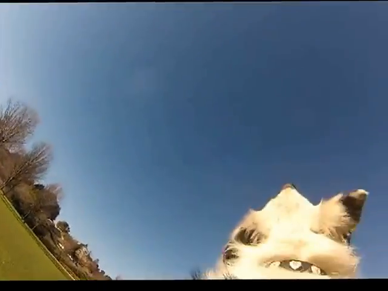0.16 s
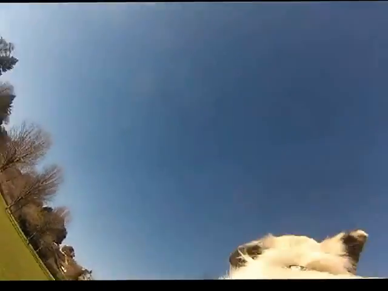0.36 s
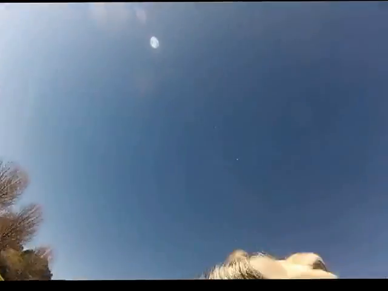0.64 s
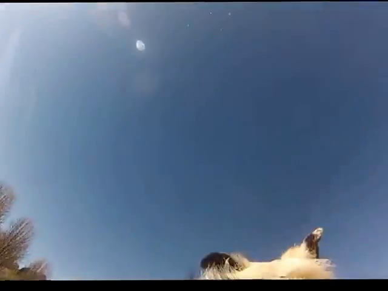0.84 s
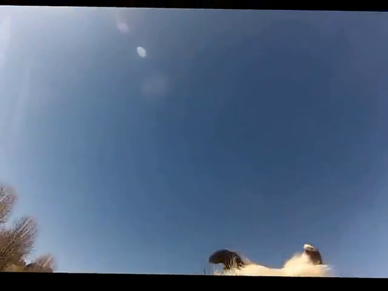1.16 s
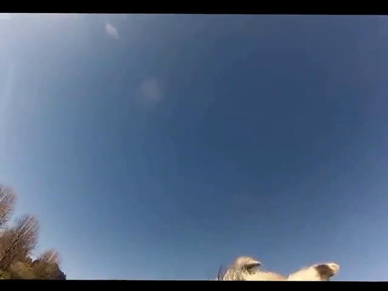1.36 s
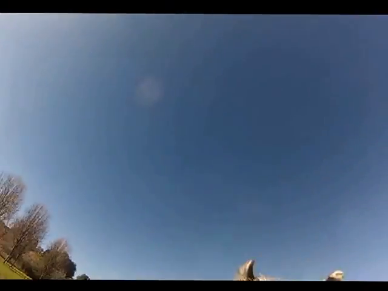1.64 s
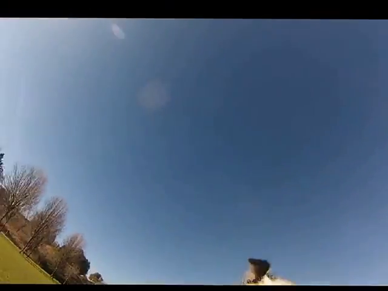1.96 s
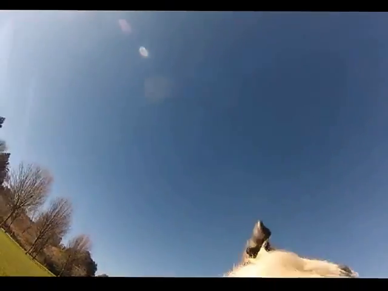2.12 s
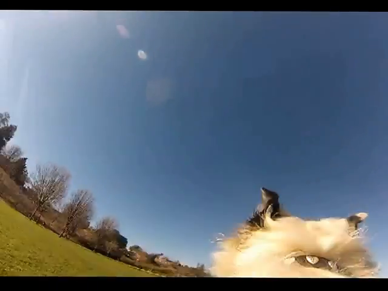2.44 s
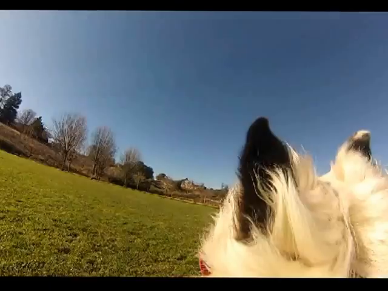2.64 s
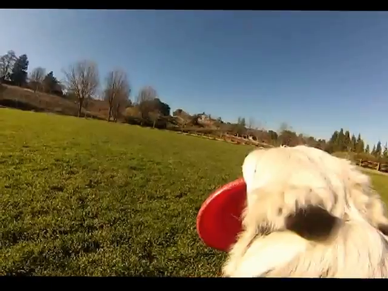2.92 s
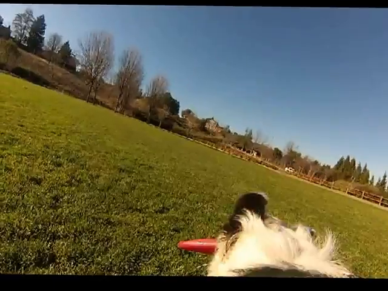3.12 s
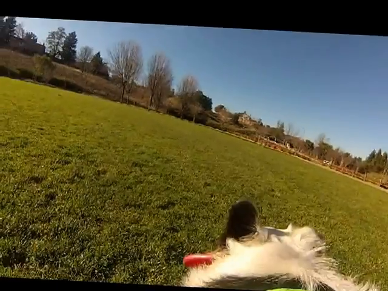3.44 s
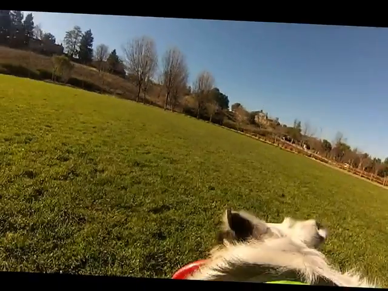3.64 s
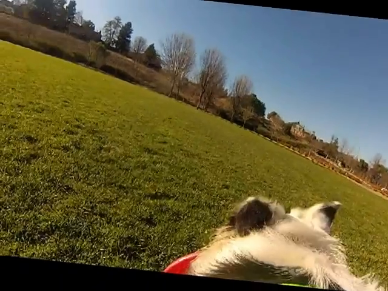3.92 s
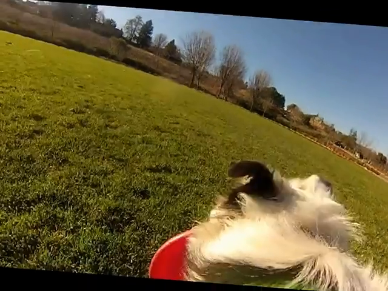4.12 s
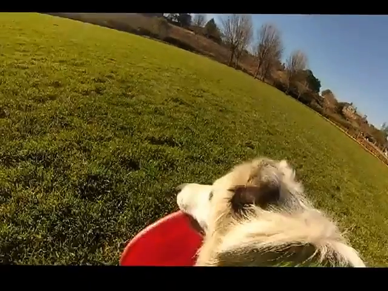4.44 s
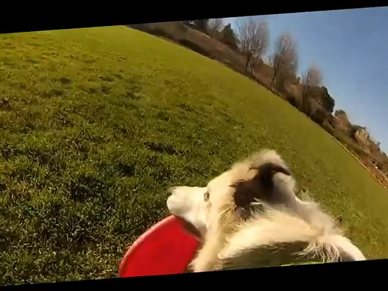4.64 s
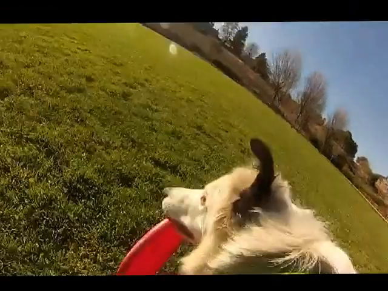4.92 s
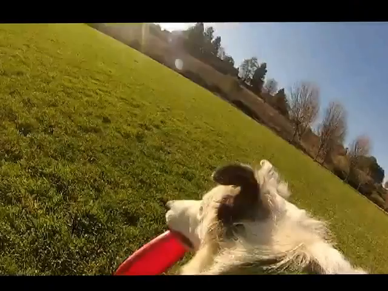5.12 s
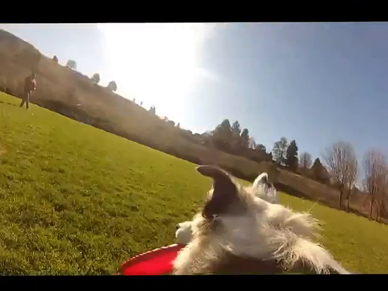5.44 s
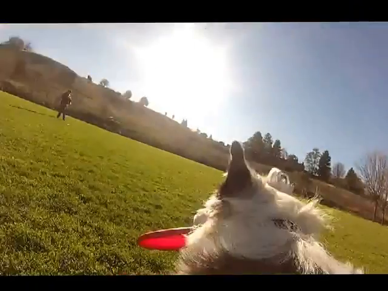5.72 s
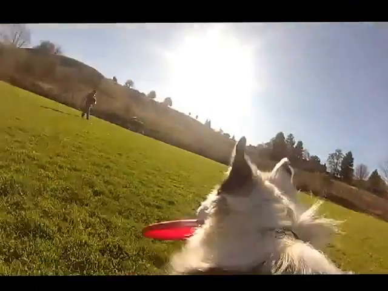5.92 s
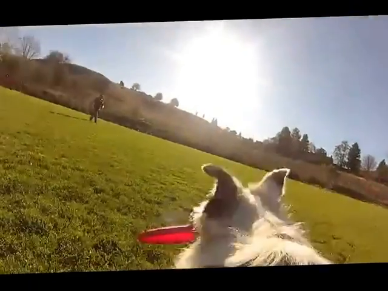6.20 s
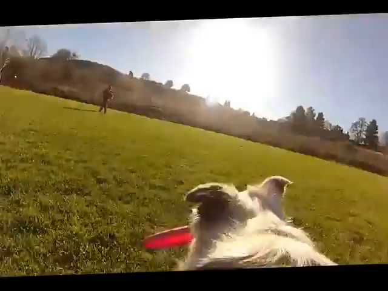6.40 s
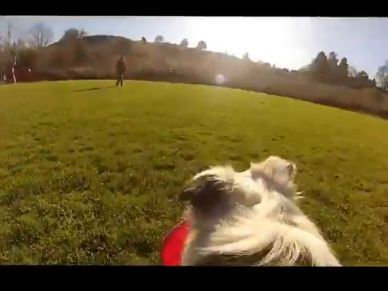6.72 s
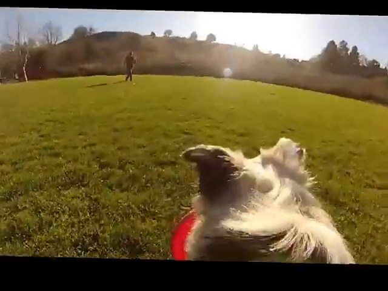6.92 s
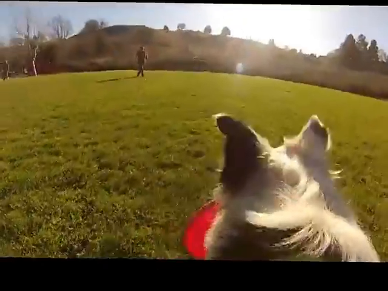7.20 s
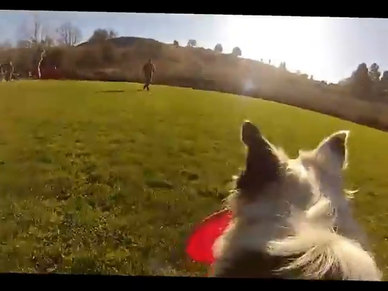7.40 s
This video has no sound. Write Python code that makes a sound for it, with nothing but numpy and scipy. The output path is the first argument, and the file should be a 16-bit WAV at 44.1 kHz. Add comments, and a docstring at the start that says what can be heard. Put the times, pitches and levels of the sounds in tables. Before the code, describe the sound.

Slowed, stuttering camera rattle on a running dog: low wavering hum, wind rumble, strap rubbing, repeated hard plastic clacks early, then small ticks fading.

```python
"""A sealed camera rides on the back of a running dog in a park: filtered-noise wind and harness rumble, fur rustle,
ticks, thin gliding bird whistles (sines) and a low wavering hum start together. The birds stop after about 2 s;
between about 2 and 3 s the housing rings under its hardest knocks, and near 5 s the octave of the hum swells.
About 1.6 s of action is played five times slower at the same pitch: every 117 ms the playback jumps back and
repeats, so each knock stutters four to six times."""
import sys
import numpy as np
from scipy import signal
from scipy.fft import rfft, irfft
from scipy.io import wavfile
from scipy.ndimage import uniform_filter1d

SR = 44100
rng = np.random.default_rng(int(sys.argv[2]) if len(sys.argv) > 2 else 0)


def transcribe(u):
    """Save the signal u as a 16-bit wav file named by the first command-line argument.

    u: samples, shape (n,) or (channels, n), limited to [-1, 1]; the rate is SR.
    q: integer samples, one column per channel.
    """
    v = np.clip(np.atleast_2d(u).T, -1, 1)
    q = np.round(v * 32767).astype(np.int16)
    wavfile.write(sys.argv[1], SR, q)


N = 333396
LIVE = round(1.75 * SR)   # samples of live action; every table time is live, before the slowing


def amp(db):
    """Decibels to a linear gain."""
    return 10 ** (np.asarray(db) / 20)


def rms_one(x):
    """Scale a signal to rms 1."""
    return x / np.sqrt(np.mean(x ** 2) + 1e-20)


def gains(rows):
    """The dB columns of a level curve as gains in live time."""
    s, *levels = np.transpose(rows)
    return [amp(np.interp(np.arange(LIVE) / SR, s, db)) for db in levels]


def swells(rows, steady):
    """Each row swells and fades smoothly, adding in power to the steady gains."""
    power = np.square(steady)
    t = np.arange(LIVE) / SR
    for middle_s, length_ms, *db in rows:
        across = np.clip((t - middle_s) * 1000 / length_ms, -0.5, 0.5)
        power = power + amp(db)[:, None] ** 2 * np.cos(np.pi * across) ** 4
    return np.sqrt(power)


def drift(rate_hz):
    """Random wander of rms 1: noise smoothed by two equal one-pole lowpasses."""
    r = np.exp(-2 * np.pi * rate_hz / SR)
    wander = signal.lfilter([1], [1, -2 * r, r * r], rng.standard_normal(LIVE + SR))
    return rms_one(wander[SR:])   # the filter settles during the first second


def rubbing(colour, even_ms, grain_db):
    """Coloured noise of rms 1: grain roughens it, and swings slower than even_ms are levelled."""
    hz = np.maximum(np.fft.rfftfreq(LIVE, 1 / SR), 1)
    points = np.array(colour)
    shape = amp(np.interp(np.log(hz), np.log(points[:, 0]), points[:, 1], left=-80, right=-80))
    grainy = rng.standard_normal(LIVE) * amp(grain_db * drift(186))
    coloured = irfft(rfft(grainy) * shape, LIVE)
    local_power = uniform_filter1d(coloured ** 2, max(int(even_ms * SR / 1000), 1))
    return rms_one(coloured / np.sqrt(local_power + 1e-20))


def ride():
    """Noise layers for sway, wind, straps, fur and grass follow the stride; returns mid and side."""
    # colours of the layers: (frequency [Hz], relative density [dB per Hz])
    sway_colour = [(12, 8), (25, 3.5), (50, -0.5), (75, -27.5)]
    buffet_colour = [(40, -37), (62, 5.5), (90, 1.5), (120, -5.5), (175, -7), (260, -23.5)]
    rub_colour = [(150, -14.5), (220, 3.5), (330, -1.5), (480, -9.5), (620, -17)]
    creak_colour = [(400, 6.5), (520, 3.5), (750, 1.5), (1050, -5), (1350, -33)]
    drone_colour = [(480, -5), (580, 0.5), (720, -4), (850, -17)]
    rustle_colour = [(950, -1), (1400, 2.5), (2500, -0.5), (3100, -4.5), (3700, -8), (4800, -18),
                     (6000, -19)]
    swish_colour = [(4000, -3.5), (5200, -0.5), (6200, 0.5), (7400, 1.5), (8400, 4), (9600, -1), (11800, 0),
                    (14000, -6.5), (15300, -8), (16500, -24)]
    # the back sways under the camera: (time [s], level [dB])
    swaying = [(.05, -18), (.2, -22.5), (.27, -30.5), (.35, -17.5), (.41, -25), (.47, -16.5), (.565, -33.5),
               (.63, -22), (.69, -25), (.73, -28.5), (.77, -25.5), (.86, -25.5), (.99, -33.5), (1.04, -26),
               (1.13, -20), (1.17, -29), (1.26, -39), (1.3, -29), (1.35, -34), (1.46, -44), (1.59, -35)]
    # wind on the housing: (time [s], level [dB])
    wind = [(.05, -31.5), (.17, -25), (.25, -24), (.3, -32.5), (.34, -30.5), (.42, -26.5), (.46, -56),
            (.5, -19.5), (.63, -44), (.75, -26), (.81, -35.5), (.84, -20), (.9, -39), (.99, -34),
            (1.06, -19), (1.12, -22.5), (1.17, -40), (1.3, -33), (1.59, -34.5)]
    # background rub of the harness, strongest near 0.8 s, then weaker: (time [s], rub level [dB])
    background_rub = [(.05, -48), (.3, -43), (.42, -45.5), (.65, -45), (.8, -36.5), (1.0, -50.5),
                      (1.2, -48.5), (1.6, -49)]
    # strides tug the straps: (middle [s], length [ms], rub level [dB], creak level [dB])
    tugs = [(.08, 80, -37, -39.5), (.165, 156, -34.5, -39), (.235, 58, -33, -47), (.28, 120, -40, -56),
            (.497, 52, -23, -37), (.595, 79, -31.5, -33.5), (.762, 45, -31, -40.5), (.845, 63, -38, -41),
            (.885, 30, -52, -42.5), (1.08, 173, -35, -46.5), (1.126, 74, -32.5, -45), (1.24, 260, -53, -56)]
    # a taut strap drones in a narrow band: (middle [s], length [ms], level [dB])
    drones = [(.16, 71, -45), (.6, 54, -50), (1.235, 130, -45.5)]
    # steady brushing of coat and grass: (time [s], fur level [dB], grass level [dB])
    coat = [(.05, -56.5, -68), (.3, -56, -72.5), (.55, -53.5, -58), (.66, -61.5, -63.5), (.8, -54.5, -61.5),
            (1.0, -56.5, -63), (1.3, -56, -64.5), (1.6, -55.5, -67)]
    # fur and grass sweep past: (middle [s], length [ms], fur level [dB], grass level [dB])
    sweeps = [(.592, 45, -40.5, -50.5), (.072, 27, -43, -60), (.116, 110, -51.5, -71),
              (.16, 23, -53.5, -57.5), (.215, 170, -56, -60), (.35, 190, -81, -68.5),
              (.446, 44, -52.5, -49.5), (.517, 54, -49, -64), (.602, 126, -48, -54), (.725, 148, -56, -63),
              (.774, 72, -57, -53), (.84, 85, -50, -50.5), (.886, 81, -54, -51), (.95, 15, -50.5, -57),
              (1.15, 250, -57.5, -54.5), (1.24, 270, -54, -66.5), (1.456, 19, -67, -89)]

    (sway,), (buffet,), (background,) = gains(swaying), gains(wind), gains(background_rub)
    creak_below_db = 6.5   # background creak beneath the background rub
    rub, creak = swells(tugs, [background, background * amp(-creak_below_db)])
    rustle, swish = swells(sweeps, gains(coat))
    (drone,) = swells(drones, np.zeros((1, LIVE)))

    rumble = sway * rubbing(sway_colour, even_ms=68, grain_db=2.5)
    rumble = rumble + buffet * rubbing(buffet_colour, even_ms=17.4, grain_db=1.5)
    straps = rub * rubbing(rub_colour, even_ms=18.6, grain_db=5.0)
    straps = straps + creak * rubbing(creak_colour, even_ms=14.6, grain_db=8.0)
    straps = straps + drone * rubbing(drone_colour, even_ms=71, grain_db=1.5)
    brush = rustle * rubbing(rustle_colour, even_ms=61, grain_db=1.0)
    brush = brush + swish * rubbing(swish_colour, even_ms=65, grain_db=2.0)

    # a faint noise, opposite in left and right, follows the creak, fur and grass levels
    side = amp(-39.0) * creak * rubbing(creak_colour, even_ms=13, grain_db=4.0)
    side = side + amp(-25.0) * rustle * rubbing(rustle_colour, even_ms=38, grain_db=16.0)
    side = side + amp(-18.5) * swish * rubbing(swish_colour, even_ms=25, grain_db=2.0)
    return rumble + straps + brush, side


def ring(x, hz, t60):
    """A two-pole resonator: a unit click sets a decaying sine of height 1 ringing."""
    r = amp(-60 / (t60 * SR))
    w = 2 * np.pi * hz / SR
    return signal.lfilter([0, np.sin(w)], [1, -2 * r * np.cos(w), r * r], x + 1e-18)


def knocks():
    """The housing knocks on its mount: band-limited chatter excites housing modes, beside decaying sines."""
    # parts of the knocks, several rows to a blow: chatter plus a decaying sine, low thud or high ring:
    # (time [s], chatter drive [dB], chatter length [ms], contact from [Hz], contact to [Hz],
    # sine drive [dB], sine pitch [Hz], sine t60 [s], sign of the first swing)
    parts = [(0.0772, -36.5, 3.9, 900, 3970, -18, 885, 0.0087, "in"),
             (.0840, -30, 1.1, 900, 2900, -19.5, 900, 0.0086, "out"),
             (0.2452, -16.5, 0.8, 2730, 12000, -6, 308, 0.0018, "out"),
             (0.248, -53, 2.6, 2000, 3870, -12, 446, 0.029, "in"),
             (0.2467, -24, 3.6, 1490, 3760, -19.5, 906, 0.026, "out"),
             (0.4874, -24.5, 4.7, 1480, 14000, -5, 193, 0.047, "in"),
             (.5000, -2.5, 3.8, 1280, 4950, 4.5, 109, 0.012, "out"),
             (0.5, 1, 2.1, 700, 14000, 6.5, 1665, 0.0033, "out"),
             (0.501, -1, 4.9, 7800, 14000, 0, 2090, 0.012, "in"),
             (0.5011, -39, 2.2, 2770, 4460, -3, 3890, 0.014, "out"),
             (.5020, -3, 2, 2630, 4680, -8, 3280, 0.0052, "in"),
             (0.5048, -27, 2.8, 600, 1470, 6.5, 322, 0.0062, "in"),
             (.5025, -14, 3.3, 600, 1200, -12, 840, 0.01, "in"),
             (0.524, -28.5, 5.3, 915, 3400, -0.5, 463, 0.01, "in"),
             (.5775, -24, 0.84, 900, 2700, -7, 108, 0.022, "out"),
             (.5800, -10.5, 1.14, 940, 5330, 12, 180, 0.0059, "out"),
             (0.5818, -22, 2.9, 590, 6000, 3.5, 425, 0.0088, "in"),
             (.6015, -36, 13, 880, 3450, -44, 468, 0.0088, "out"),
             (0.618, -44, 6.6, 600, 2500, -16.5, 388, 0.027, "in"),
             (.8878, -33.5, 3.3, 970, 9000, -22.5, 577, 0.0086, "in"),
             (1.062, -51, 1.06, 700, 1700, -18, 890, 0.0017, "out"),
             (1.0622, -52, 1.5, 300, 900, -11.5, 258, 0.0096, "out"),
             (1.075, -52, 1.5, 300, 900, -20, 293, 0.0089, "in"),
             (1.1265, -46, 1.5, 300, 900, -16.5, 330, .01, "out"),
             (0.489, -17, 2.1, 4500, 14000, -28, 5200, 0.0057, "in"),
             (.690, -53.5, 2, 600, 1500, -43, 790, 0.0054, "in"),
             (.775, -48, 2, 600, 1500, -46, 840, .006, "out"),
             (.830, -45, 3.6, 600, 1500, -31, 647, 0.0054, "in"),
             (1.074, -54, 2, 700, 1500, -26, 890, 0.0032, "in"),
             (1.090, -52, 2, 607, 1300, -27, 593, 0.017, "out"),
             (1.127, -48, 1.1, 700, 1600, -32, 895, 0.0021, "in"),
             (1.145, -52, 2, 610, 1300, -33, 646, 0.014, "out"),
             (1.458, -56, 1.5, 700, 2000, -29, 900, .004, "in")]
    # ringing modes of the housing: (frequency [Hz], relative level [dB], t60 [s])
    modes = [(900, -6.5, 0.011), (1414, 1.5, 0.0037), (1768, 3.5, 0.005), (2000, 2.5, 0.0057),
             (2235, 1.5, 0.0055), (2710, -10, 0.01), (3210, -3, 0.0066), (3890, -8, 0.0054),
             (4380, -8.5, 0.0068), (4690, -13.5, 0.0074), (5200, -12.5, 0.0054), (5900, -30, 0.0036),
             (7500, -10, 0.0027), (8840, -23, 0.0061), (10400, -17, 0.0032), (11680, -28, 0.0082),
             (14000, -21, 0.0015)]
    modes_db, bare_contact_db = -5.0, -11.5   # all the ringing; the contact noise itself
    sine_rise_ms = 0.46

    chatter, sines = np.zeros(LIVE), np.zeros(LIVE)
    t = np.arange(SR // 20) / SR
    rise = 1 - np.exp(-t * 1000 / sine_rise_ms)
    for s, drive_db, ms, from_hz, to_hz, sine_db, sine_hz, t60, swing in parts:
        start = round(s * SR)
        at = slice(start, start + len(t))
        sign = 1 if swing == "in" else -1
        contact = 0.37 * rng.standard_normal(len(t)) * np.clip(1 - t * 1000 / ms, 0, 1) ** 1.07
        contact[0] = sign * 0.49   # the first sample has a set strength and sign
        band = signal.butter(2, [from_hz, to_hz], "band", fs=SR, output="sos")
        chatter[at] += amp(drive_db) * signal.sosfilt(band, contact)
        sines[at] += sign * amp(sine_db - 60 * t / t60) * rise * np.sin(2 * np.pi * sine_hz * t)

    clack = np.zeros(LIVE)
    for k, (hz, db, t60) in enumerate(modes):
        clack += (-1) ** k * amp(db + modes_db) * ring(chatter, hz, t60)   # neighbours in opposite sign
    return clack + amp(bare_contact_db) * chatter + sines


def ticks():
    """Each row is a broad crack, then a short swell and decay at one pitch, roughened by grit."""
    # ticks and pitched parts of knocks; rows at the same time sound as one:
    # (time [s], peak of the smooth swell [dB], pitch [Hz], t60 of the decay [ms])
    tick_parts = [(0.0718, -43, 4570, 2.6), (0.1597, -42, 7300, 2.5), (.160, -45, 6560, 3),
                  (0.2205, -39.5, 6470, 2.5), (0.3187, -42, 8240, 0.62), (.3510, -47.5, 6900, 2.4),
                  (.084, -29, 1750, 6), (.369, -47, 2570, 3), (.3692, -66, 3520, 3.6),
                  (0.383, -50, 4200, 1.5), (0.385, -48, 7500, 1.1), (0.5517, -40, 6170, 3.3),
                  (0.6424, -35.5, 5340, 1.15), (.677, -42.5, 5180, 1.8), (0.7074, -44, 6650, 2),
                  (0.739, -41.5, 6900, 3.2), (0.7385, -40, 3860, 6.9), (.7389, -42, 5040, 2),
                  (.5527, -51, 7800, 1.5), (0.788, -33, 9300, 0.55), (0.7875, -34, 3020, 1.1),
                  (0.828, -41, 6700, 2.6), (0.83, -37, 3700, 2.6), (.8282, -41, 2430, 3),
                  (0.846, -38.5, 2370, 4.5), (0.8475, -35.5, 3640, 2.4), (.8905, -52, 1570, 7.8),
                  (0.8873, -30.5, 7000, 1.4), (0.947, -38, 6660, 1.2), (1.0873, -40, 9400, 0.97),
                  (1.1253, -40.5, 6300, 2.4), (1.1464, -36, 11100, 1.1), (1.1642, -37.5, 7700, 1.8),
                  (1.1642, -41, 2960, 2.2), (1.1744, -34, 3150, 1.15), (1.126, -33, 4430, 0.39),
                  (1.157, -44, 9500, .6), (1.1608, -31, 10500, 0.53), (1.1744, -32, 11100, 0.56),
                  (1.205, -31.5, 9250, 0.64), (1.204, -42, 3240, 1.6), (1.380, -61, 3870, 4),
                  (1.226, -43, 5660, 0.67), (1.3850, -47, 690, 4.6), (.2455, -31.5, 4470, 3),
                  (.2460, -43, 5900, 1.2), (.248, -32.5, 1810, 2.5), (1.375, -41.5, 2940, 1.5),
                  (.250, -47, 3770, 10), (.250, -52, 4570, 10), (.2205, -51, 3900, 3.5),
                  (.2205, -50, 5200, 3), (.580, -35, 1700, 1.7), (.581, -42, 2440, 2.5),
                  (1.375, -34.5, 1820, 2.8), (1.375, -36, 900, 2.3), (.695, -49, 2500, 2.5),
                  (.695, -56, 5000, 2), (.739, -42.5, 1600, 3.9), (.790, -42, 6500, 0.97),
                  (.815, -40, 8000, 0.89), (.888, -54, 3100, 1.4), (.888, -52, 4800, 2.4),
                  (.912, -50, 4970, 2.5), (.920, -55, 12000, 0.9), (1.104, -43, 9000, 1.2),
                  (1.110, -42, 10000, 1), (1.122, -44.5, 6500, 3.2), (1.150, -54, 8000, 0.66),
                  (1.156, -37, 4050, 1), (1.192, -51, 9000, 1), (1.198, -41, 10500, 0.68),
                  (1.205, -42, 5200, 1.5), (1.448, -57, 4000, 2.5), (1.448, -65, 7000, 1.4)]
    grit_share = 0.29
    crack_db, crack_ms = -16, 0.36   # beside the swell; decay constant

    out = np.zeros(LIVE)
    t = np.arange(SR // 50) / SR
    for s, db, hz, t60_ms in tick_parts:
        start = round(s * SR)
        noise = rng.standard_normal(len(t))
        age = t * 1000 * np.log(1000) / t60_ms
        swell = age * np.exp(1 - age)   # peaks at 1
        grit = 1 + grit_share * uniform_filter1d(noise, size=4)
        tone = grit * swell * np.sin(2 * np.pi * hz * t)
        crack = amp(crack_db) * np.diff(noise, prepend=0) * np.exp(-t * 1000 / crack_ms)
        out[start:start + len(t)] += amp(db) * (tone + crack)
    return out


def birds():
    """Thin whistles: sines that glide in pitch, with both ends curling upward."""
    # chirps: (start [s], end [s], glide from [Hz], glide to [Hz], upward curl at the ends [share of pitch],
    # rms between the fades [dB])
    chirps = [(0.04, 0.077, 6740, 6700, 0.003, -67), (0.07, 0.107, 7600, 6000, 0.034, -68),
              (0.092, 0.138, 3150, 3200, 0.052, -54), (0.293, 0.342, 7900, 8000, 0.026, -69.5),
              (.336, .350, 6700, 6900, .03, -68), (.352, 0.425, 7370, 5970, .055, -67.5),
              (0.41, 0.43, 3300, 3200, 0.023, -64.5)]
    out = np.zeros(LIVE)
    for start_s, end_s, from_hz, to_hz, bend, db in chirps:
        start, n = round(start_s * SR), round((end_s - start_s) * SR)
        curl = 1 + bend * np.linspace(-1, 1, n) ** 4
        phase = 2 * np.pi * np.cumsum(np.linspace(from_hz, to_hz, n) * curl) / SR
        fades = signal.windows.tukey(n, 0.3)
        out[start:start + n] += np.sqrt(2) * amp(db) * fades * np.sin(phase)
    return out


def hum():
    """A low sine that wavers a little in level and phase, with an octave that fades and swells again."""
    # hum curve: (time [s], tone rms before its waver [dB], octave rms [dB])
    hum_levels = [(0, -30.5, -49), (.45, -34, -62), (.85, -32.5, -71), (.9, -31.5, -44.5), (1.0, -34, -42),
                  (1.05, -31, -38.5), (1.3, -32.5, -56.5), (1.45, -32, -55), (1.6, -31, -58.5)]
    hum_hz = 119.4
    waver_db, waver_hz = 1, 5
    turn = 2 * np.pi * hum_hz * np.arange(LIVE) / SR + 0.3 * drift(5.5)   # phase [rad]
    tone, octave = gains(hum_levels)
    wavering = tone * amp(waver_db * drift(waver_hz))
    return np.sqrt(2) * (wavering * np.sin(turn) + octave * np.sin(2 * turn))


def slow_motion(live):
    """Pieces of live sound laid end to end, each a jump behind the last, cross-faded per channel."""
    # how far the playback jumps back at each splice: (jump [ms])
    jump_back_ms = [106.1, 81.81, 93.24, 112.93, 82.72, 101.47, 72.24, 94.69, 117.48, 93.61, 74.42, 112.06,
                    73.06, 98.8, 84.72, 115.65, 81.63, 85.08, 98.16, 90.16, 115.08, 74.31, 88.75, 103.08,
                    84.13, 93.61, 101.09, 105.17, 83.97, 89.05, 105.28, 101.9, 93.72, 85.74, 86.58, 101.11,
                    83.22, 108.23, 82.95, 86.03, 104.58, 81.0, 99.64, 101.34, 86.83, 95.46, 107.19, 74.81,
                    94.35, 101.86, 86.62, 109.07, 94.49, 74.31, 109.09, 77.23, 101.11, 92.22, 86.28, 101.38,
                    91.16, 104.9, 74.83, 101.32, 94.49]
    # how far the right channel trails in each piece: (lag [samples])
    right_lag = ([-1, 0, 1, 1, 1, 0, 0, 0, 0, 0, 0, 0, 0, 0, 0, 0, 3, 3, 3, 3, 2, 1, 7, 0, 2, 0, 0, 1, 1] +
                  [0] * 29 + [-1, -1, -1, -1, 1, 1, 1, 0])
    splice, first_splice, crossfade = 5160, 1402, 352   # samples

    jumps = np.round(np.array(jump_back_ms) * SR / 1000).astype(int)
    n = np.arange(N)
    piece = (n - first_splice) // splice + 1
    since_splice = (n - first_splice) % splice
    fade = np.where(piece > 0, np.clip(since_splice / crossfade, 0, 1), 1)
    out = []
    for channel, lag in zip(live, [0, np.array(right_lag)]):
        # playback starts one jump into the live sound
        behind = np.cumsum([0, *jumps]) - jumps[0] + lag
        entering = channel[n - behind[piece]]
        leaving = channel[np.minimum(n - behind[np.maximum(piece - 1, 0)], LIVE - 1)]
        out.append(fade * entering + (1 - fade) * leaving)
    return np.array(out)


def scene():
    """The live ride in mid and side, turned into left and right, then slowed."""
    ride_mid, side = ride()
    mid = ride_mid + knocks() + ticks() + birds() + hum()
    return slow_motion(np.array([mid + side, mid - side]))


def record(dry):
    """The hardest knocks overload with a rounded knee; a steep lowpass cuts the top."""
    clipped = dry / (1 + np.abs(dry / 0.97) ** 6) ** (1 / 6)
    # 70 dB down from 16.6 kHz upward
    return signal.sosfilt(signal.cheby2(12, 70, 16600, fs=SR, output="sos"), clipped)


dry = scene()
out = record(dry)
transcribe(out)
```